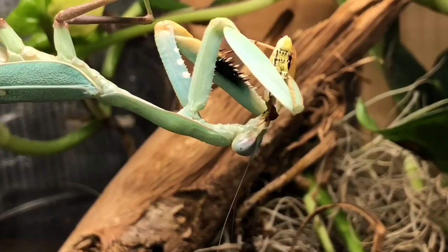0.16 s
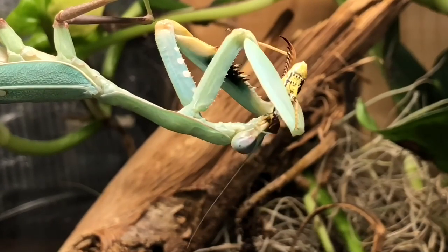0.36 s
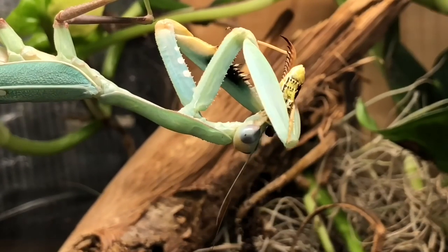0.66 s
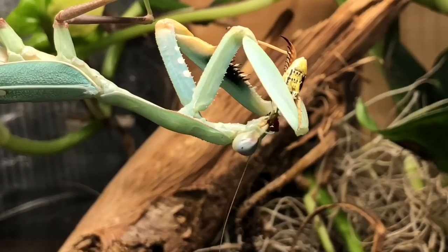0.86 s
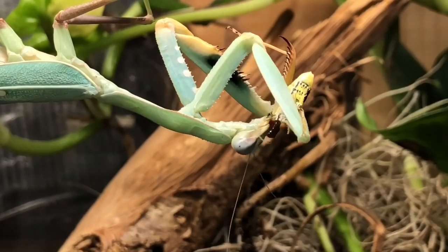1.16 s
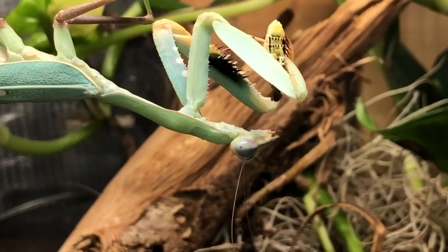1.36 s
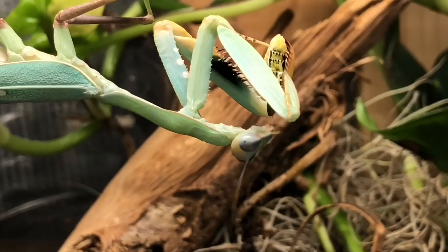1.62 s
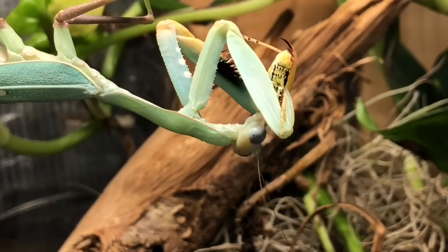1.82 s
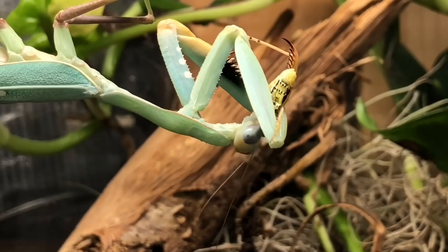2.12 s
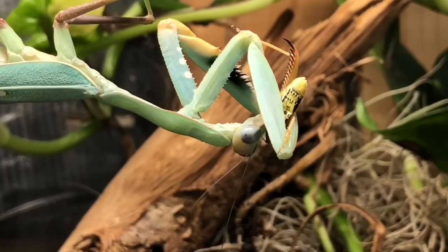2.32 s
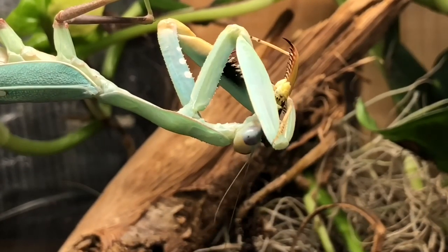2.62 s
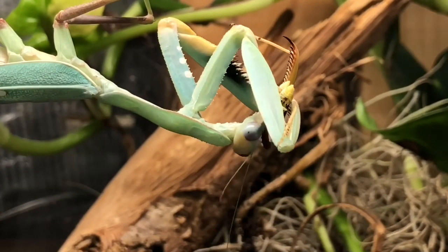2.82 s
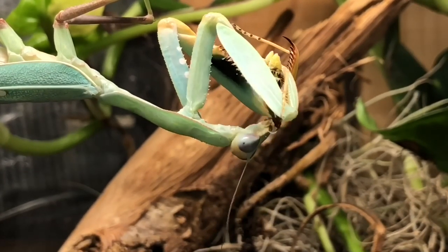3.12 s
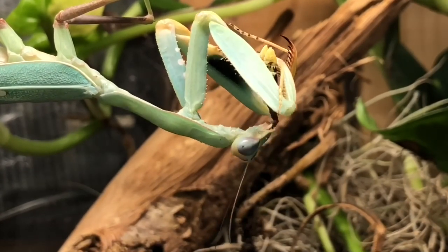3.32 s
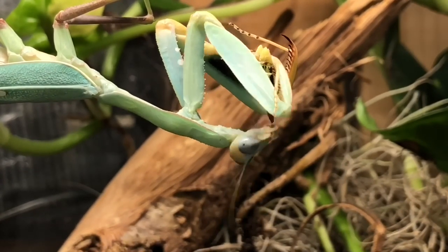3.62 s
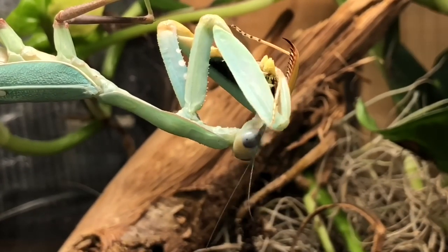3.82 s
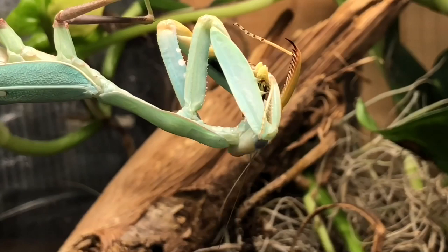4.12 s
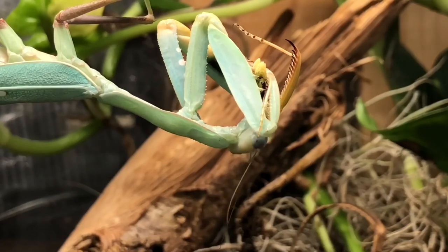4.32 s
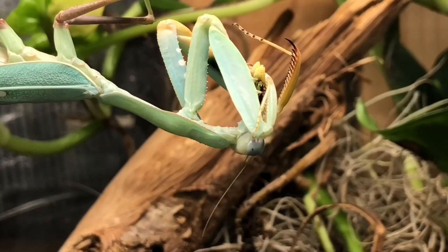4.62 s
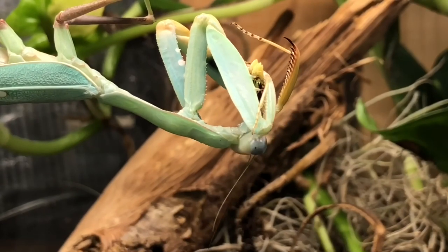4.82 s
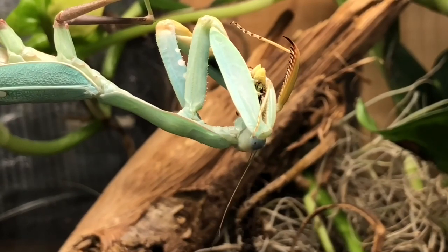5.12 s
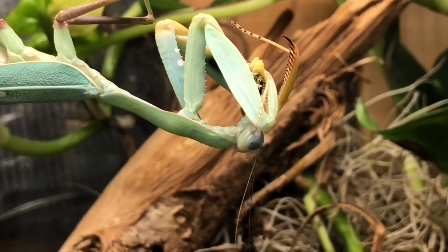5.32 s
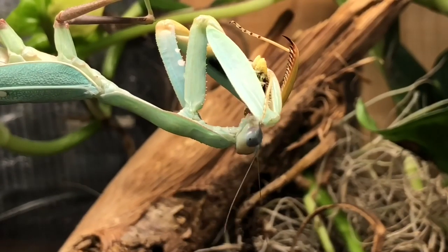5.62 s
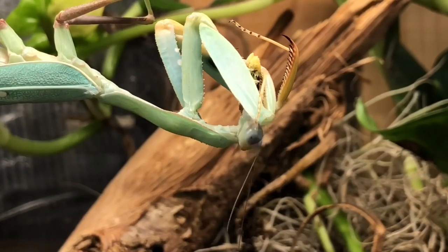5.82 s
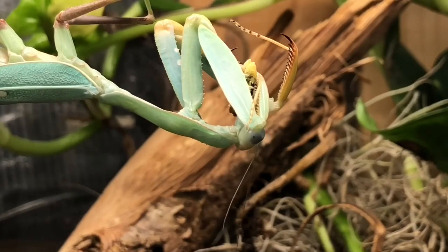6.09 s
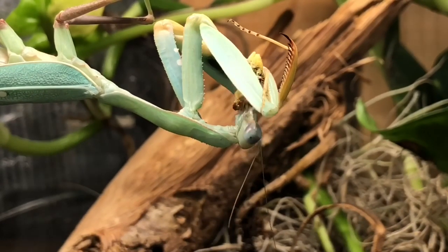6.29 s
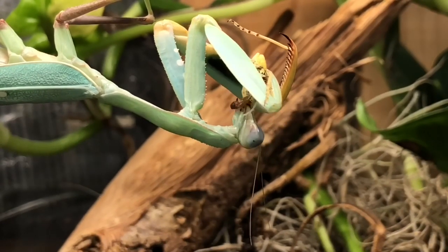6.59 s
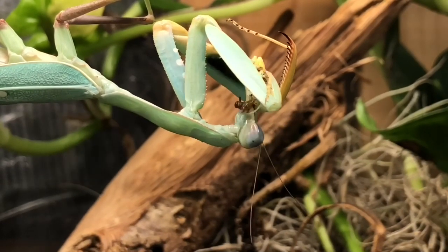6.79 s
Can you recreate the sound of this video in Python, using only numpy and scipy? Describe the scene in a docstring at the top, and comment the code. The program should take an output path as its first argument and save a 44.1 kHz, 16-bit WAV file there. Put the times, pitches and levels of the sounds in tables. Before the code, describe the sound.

Dry little snaps, scrapes and tears of insect shell being bitten, crowding together midway, then thinning out over steady airy hiss.

```python
"""Very close to a mantis chewing an insect, through a microphone with a steep bass cut; about seven seconds.
From the start a thin hiss and the whine of a small fan lie behind; the first bites are few, then come soft bumps.
Bites crowd together near 3 s, with scraping and tearing; the loudest falls at 3.6 s, then they thin out.
In each bite one jaw, then the other, breaks the shell: noise fractures excite resonances and a ring near 3 kHz.
Fan and hiss are filtered noise and sines, bumps dull noise pulses, scrapes gated crackle, tears runs of fractures."""
import sys
import numpy as np
from scipy import signal
from scipy.fft import rfft, irfft
from scipy.io import wavfile

SR = 44100
rng = np.random.default_rng(int(sys.argv[2]) if len(sys.argv) > 2 else 0)


def to_wav(s):
    """Save 16-bit WAV."""
    ch = np.atleast_2d(s).T  # columns
    pcm = np.round(np.clip(ch, -1, 1) * 32767)  # PCM
    wavfile.write(sys.argv[1], SR, pcm.astype(np.int16))


N = 306495  # samples

# Steady hiss behind the animal. Each row: frequency in Hz, relative level in dB.
HISS_COLOUR = [(30, -43), (100, -27), (400, -27.5), (480, -16.5), (700, -11), (1000, 3), (1500, 2),
               (2400, 8.5), (3000, 4), (4000, 0.5), (6500, -3), (8500, -5), (11000, -7.5), (16000, -9)]
# Air resonances of the fan. Each row: centre in Hz, width in Hz, relative level in dB.
FAN_RESONANCES = [(558, 42, -19), (1068, 26, -1.5), (1337, 150, -1), (1600, 67, 0.5), (1690, 31, -2),
                  (1940, 130, -7)]
# Whine of the fan. Each row: frequency in Hz, mean amplitude in dB.
FAN_WHINE = [(906, -67), (1600.5, -67), (1789, -71), (3200, -77), (3579.5, -64), (6401, -76.5),
             (14400, -92)]
# Slow drift of the background. Each row: time in seconds, rush near 1.7 kHz in dB before the wall echo,
# rush near 2.2 kHz in dB, high hiss in dB.
BACKGROUND_DRIFT = [(0, -88.5, -62.5, -88), (1.0, -79, -64.5, -87), (1.25, -76.5, -68, -74),
                    (1.8, -76.5, -65, -87), (2.5, -75, -64.5, -87), (2.7, -71.5, -68, -67.5),
                    (4.1, -67.5, -69, -77.5), (5.3, -74.5, -67, -81.5), (5.5, -63.5, -77.5, -69.5),
                    (6.95, -65.5, -77, -69.5)]
# Soft bumps. Each row: time in seconds, level in dB before a common 12 dB cut.
SOFT_BUMPS = [(1.234, -51), (1.315, -59), (1.813, -42.5), (1.855, -42), (2.143, -52), (2.48, -50.5),
              (2.519, -54), (4.375, -49.5), (5.245, -53.5), (5.286, -47.5), (5.486, -45.5), (5.531, -51),
              (6.178, -55.5), (6.229, -58)]
# Colour of a bump. Each row: frequency in Hz, relative level in dB.
BUMP_SPECTRUM = [(300, -29), (500, -9.5), (800, -6.5), (1000, 8.5), (1300, -7.5), (2500, -27)]
# Mouthparts scraping. Each row: start in seconds, end in seconds, shell ring in dB, crackle in dB.
SCRAPE_PASSAGES = [(1.45, 1.54, -70, -64), (1.968, 2, -51, -50.5), (2.759, 2.784, -45.5, -54),
                   (2.822, 3.074, -57, -66), (3.119, 3.157, -42, -48), (3.166, 3.207, -49.5, -56),
                   (3.27, 3.522, -55, -62.5), (3.542, 3.703, -63, -65.5), (4.28, 4.331, -52.5, -63.5),
                   (4.601, 4.813, -56.5, -67.5), (5.587, 5.702, -58, -66), (6.332, 6.438, -62.5, -62.5)]
# Tearing, a quick run of small fractures while the mantis pulls a piece off.
# Each row: start in seconds, end in seconds, mean shell ring in dB.
TEAR_RUNS = [(2.871, 2.968, -49), (3.412, 3.48, -49.5), (4.64, 4.762, -62)]
# Bright resonances that every fracture excites. Each row: centre in Hz, width in Hz, relative level in dB.
BRIGHT_RESONANCES = [(4470, 330, 0), (5555, 230, 1.5), (6550, 930, -2.5), (7620, 240, 3.5),
                     (8750, 980, -1.5), (9860, 280, 5), (10190, 1200, -3.5), (14230, 870, -4.5),
                     (13150, 430, -9.5), (14700, 800, -3)]
# Low, hollow resonances of the prey, shifted a little at each fracture.
# Each row: mean centre in Hz, width in Hz, mean relative level in dB.
HOLLOW_RESONANCES = [(1005, 220, -4.5), (1240, 710, -5), (1753, 290, -1), (2128, 72, 2.5), (2700, 300, -13)]
# Bites. Each row: time in seconds, shell ring in dB, ring pitch in Hz, sharp crack in dB,
# first jaw's fracture time scale in ms, second jaw against the first in dB.
JAW_BITES = [(0.166, -51.5, 3000, -44.5, 1.34, -20), (0.316, -56, 3130, -74, 0.46, -15),
             (0.8049, -56, 2850, -75, 1.5, -15), (0.8618, -44, 3060, -56, 1.4, -22),
             (0.9007, -45.5, 2020, -46, 1.26, -18), (0.9175, -43, 2060, -40, 2.1, -17),
             (1.607, -56, 2600, -52.5, 1.2, -9), (1.692, -60.5, 2930, -68, 2, -10),
             (1.9506, -56, 3100, -55.5, 0.99, -17), (1.9755, -42, 3010, -32, 0.21, -3.5),
             (2.3371, -51.5, 2860, -62, 3.6, -22), (2.3564, -53.5, 2850, -56, 4.4, -4),
             (2.5693, -41.5, 3530, -46.5, 0.85, -6), (2.763, -56.5, 2930, -52.5, 2.7, 9.5),
             (2.83, -41.5, 2850, -50.5, 1.3, 1.5), (2.886, -46, 2900, -50.5, 1.8, -21),
             (2.899, -43, 2900, -48, 0.9, -4), (2.9239, -44, 3690, -44.5, 2.9, 2),
             (2.935, -37.5, 2930, -50, 0.88, -13), (2.9786, -40, 3370, -47, 0.73, -6),
             (2.9906, -33, 3030, -36, 0.68, -27), (3.0306, -39, 3140, -61, 1.2, -28),
             (3.0426, -39.5, 4010, -48, 2.2, -16), (3.058, -38, 3040, -50, 0.84, -21),
             (3.1386, -41, 3950, -36, 0.91, -5), (3.1853, -30.5, 3300, -41.5, 0.64, -15),
             (3.2331, -50, 2940, -59.5, 1.3, 6), (3.2569, -28, 3230, -31.5, 0.92, -7),
             (3.3525, -46.5, 3300, -54.5, 1.4, -12), (3.3782, -46, 3000, -60, 1.9, -20),
             (3.4047, -44, 3800, -52.5, 2.5, -18), (3.4871, -41, 3320, -49, 1.1, -10),
             (3.5333, -35, 3200, -43, 2.2, -19), (3.5479, -30, 3540, -42, 1.66, -18),
             (3.6078, -18.5, 3380, -26, 1.2, -23), (4.254, -50.5, 3350, -60.5, 0.51, -20),
             (4.2883, -39, 2860, -51, 2.2, -21), (4.5702, -54.5, 3400, -73, 0.74, -15),
             (4.591, -44.5, 3010, -53, 2.2, -18), (4.7744, -35, 2420, -52.5, 1.4, -17),
             (4.8442, -51, 2920, -87, 1.6, -7), (4.8592, -49.5, 2830, -88, 1.6, -1.5),
             (5.3669, -42, 2600, -61, 0.36, -11), (5.374, -46, 2870, -52, 2.3, -3),
             (5.391, -42.5, 2480, -75, 0.73, -12), (5.4412, -50, 2290, -77, .5, -15),
             (5.458, -52.5, 2380, -75, 3.9, -15), (5.6336, -34.5, 2940, -35.5, 3, 5),
             (5.644, -25, 2980, -34, 0.88, -19), (5.652, -32.5, 2500, -36, 1.9, -15),
             (5.7537, -41, 3204, -48, 5.7, -3), (5.824, -52, 3330, -64, 2.4, -17),
             (5.8341, -53.5, 3290, -55, 4.7, -17), (5.899, -49, 3370, -50.5, 2, -2),
             (6.2981, -39.5, 2470, -61, 0.99, -20), (6.6072, -55, 2840, -67, 1.1, -8)]

# samples that hold one short sound, and the silent samples that open a fracture
WINDOW, LEAD = 2048, 256
TEARS_PER_S, TEAR_RING_HZ, TEAR_CRACK_DB, TEAR_MS = 55, 3270, -6.5, 1.13
# the second jaw closes just after the first, on shell that is already cracked, and sounds duller
SECOND_JAW_S, SECOND_CRACK_DB, SECOND_JAW_MS = 0.0058, -4, 1.62
# the hollow body answers every fracture: its typical level, and how it follows ring, crack and length
TYPICAL_RING_DB, TYPICAL_CRACK_DB, TYPICAL_BODY_DB = -40.5, -53, -50
BODY_PER_RING, BODY_PER_CRACK, BODY_DB_PER_DOUBLING = 0.45, 0.26, 2
# harder cracks are brighter: dB of top treble per dB of crack
TREBLE_PER_CRACK = 0.26
RECORDER_TOP_HZ = 16400


def undb(db):
    """Decibels to gain."""
    return 10 ** (np.asarray(db) / 20)


def unit(x):
    """Scale to rms 1."""
    return x / np.sqrt(np.mean(x ** 2))


def colour(x, points):
    """Shape a sound with a smooth (Hz, dB) spectrum."""
    hz, db = np.transpose(points)
    f = np.fft.rfftfreq(len(x), 1 / SR)
    gain = undb(np.interp(np.log(f + 1), np.log(hz), db))
    return irfft(rfft(x) * gain, len(x))


def resonate(x, hz, width_hz):
    """One damped resonance, gain 1 at its centre."""
    b, a = signal.iirpeak(hz, hz / width_hz, fs=SR)
    return signal.lfilter(b, a, x)


def ring(x, modes):
    """A set of resonances; neighbours swing in opposite directions."""
    return sum((-1) ** k * undb(db) * resonate(x, hz, width)
               for k, (hz, width, db) in enumerate(modes))


def cut_below(x, hz, order):
    """High-pass."""
    return signal.sosfilt(signal.butter(order, hz, "high", fs=SR, output="sos"), x)


def shell_band(x, centre_hz, half_width_hz):
    """The broad, steep-sided band in which the shell rings."""
    edges = [centre_hz - half_width_hz, centre_hz + half_width_hz]
    return signal.sosfilt(signal.butter(3, edges, "band", fs=SR, output="sos"), x)


def walk(rate):
    """Random wavering with a spread near 1, through this many random points a second."""
    knots = rng.standard_normal(4096)
    return np.interp(np.arange(N) / SR * rate, np.arange(len(knots)), knots)


def grains(size, spread_db):
    """Dense tiny fractures: mostly weak, a few strong."""
    kick, strength = rng.standard_normal((2, size))
    return unit(kick * undb(spread_db * strength))


def add(out, s, sound):
    """Mix a sound in at time s."""
    i = max(int(s * SR), 0)
    out[i:i + len(sound)] += sound[:len(out) - i]


def burst(x, db):
    """Give a short sound the energy of 10 ms at this level."""
    return x * undb(db) * np.sqrt(SR / 100 / np.sum(x ** 2))


def fan_whine():
    """Steady tones of the fan, each wavering slightly in level and pitch."""
    whine = np.zeros(N)
    for hz, db in FAN_WHINE:
        level = undb(db + walk(5.0))
        pitch_hz = hz * (1 + .0004 * walk(9.2))
        whine += level * np.sin(2 * np.pi * np.cumsum(pitch_hz) / SR)
    return whine


def background(wall_s=0.004962, wall_share=0.27):
    """Smooth noise hiss, with a fan's resonant rush and its whine."""
    t = np.arange(N) / SR
    s, *columns = np.transpose(BACKGROUND_DRIFT)
    low_db, mid_db, high_db = (np.interp(t, s, c) for c in columns)
    noise = rng.standard_normal((5, N))
    hiss = undb(-65.5) * unit(colour(noise[0], HISS_COLOUR))
    hiss += undb(high_db) * unit(colour(noise[1], [(2000, -40.5), (6000, -9.5), (13000, -3.5)]))
    rush = undb(-65.5) * unit(ring(noise[2], FAN_RESONANCES))
    rush += undb(low_db) * unit(resonate(resonate(noise[3], 1700, 350), 1700, 350))
    # an echo from a nearby wall ripples the spectrum and makes this part of the rush hollow
    rush += wall_share * np.interp(t - wall_s, t, rush)
    rush += undb(mid_db) * unit(resonate(resonate(noise[4], 2070, 290), 2270, 330))
    air = colour(hiss + cut_below(rush, 520, order=8), [(15700, 0), (16100, -35)])
    return air + fan_whine()


def bumps(decay_s=0.0031):
    """Soft, dull knocks: noise that swells and dies within milliseconds."""
    t = np.arange(WINDOW) / SR
    out = np.zeros(N)
    for s, db in SOFT_BUMPS:
        pulse = rng.standard_normal(WINDOW) * t * np.exp(-t / decay_s)
        knock = colour(pulse, BUMP_SPECTRUM)
        add(out, s - .002, burst(knock, db - 12))
    return cut_below(out, 493, order=8)


def scraping(edge_s=0.02, patchy_db=5.5, slip_db=6):
    """Mouthparts catch and slip on the shell: a fine, uneven crackle."""
    t = np.arange(N) / SR
    # each slip lasts a few milliseconds, and the grip between slips is much quieter
    slipping = undb(7 * np.tanh(walk(330) - .5) + patchy_db * np.tanh(walk(45)))
    slips = grains(N, slip_db) * slipping
    shell = unit(shell_band(slips, centre_hz=3264, half_width_hz=960))
    bright = ring(slips, BRIGHT_RESONANCES) + 0.12 * slips
    crackle = unit(colour(bright, [(2500, -17), (5000, -4.0), (9000, -10.5), (16000, -10)]))
    out = np.zeros(N)
    for start, end, ring_db, crackle_db in SCRAPE_PASSAGES:
        contact = np.clip(np.minimum(t - start, end - t) / edge_s + .5, 0, 1)
        on = contact > 0
        scrape = undb(ring_db) * unit(shell[on]) + undb(crackle_db) * unit(crackle[on])
        out[on] += contact[on] * scrape
    return cut_below(out, 480, order=4)


def shell_ring(ms, length_ms, ring_hz, swell, tail):
    """The shell swings up for a few cycles at its own pitch, roughened by the splintering."""
    build_up = ms / max(length_ms, .9)
    envelope = np.hypot((build_up * np.exp(1 - build_up)) ** 4, tail / 2)
    swing = envelope * np.sin(2 * np.pi * ring_hz * ms / 1000)
    rough = rng.standard_normal(WINDOW) * np.hypot(swell / 2, tail)
    splinters = shell_band(rough, ring_hz, half_width_hz=890)
    return colour(unit(swing) + .65 * unit(splinters), [(2000, -12), (2600, 0), (4000, 0), (4500, -18)])


def hollow_body(force):
    """The prey's hollow resonances, pushed by the fracture and by one sharp knock."""
    # each fracture lands on another spot, so the resonances shift and trade strength
    spot = rng.standard_normal((len(HOLLOW_RESONANCES), 2))
    modes = [(hz * np.exp(.04 * shift), width, db + 4 * strength)
             for (hz, width, db), (shift, strength) in zip(HOLLOW_RESONANCES, spot)]
    push = force / np.linalg.norm(force) + signal.unit_impulse(WINDOW, LEAD)
    return cut_below(ring(push, modes), 720, order=2)


def sharp_crack(force, crack_db, length_ms, bright_db):
    """Bright resonances of the break; a quick, hard fracture is brighter than a slow crush."""
    tilt_db = .5 + bright_db * np.log2(length_ms) + TREBLE_PER_CRACK * (crack_db - TYPICAL_CRACK_DB)
    bright = ring(force, BRIGHT_RESONANCES) + 0.2 * force
    return colour(bright, [(3500, -9.5), (5000, 5.5), (9000, 2.5), (15000, tilt_db)])


def fracture(ring_db, ring_hz, crack_db, length_ms, echo_ms=3, bright_db=-4):
    """The shell gives way in a swell of tiny fractures; near surfaces scatter a short tail."""
    # a harder or slower break shakes the hollow body more
    body_db = (TYPICAL_BODY_DB + BODY_PER_RING * (ring_db - TYPICAL_RING_DB)
               + BODY_PER_CRACK * (crack_db - TYPICAL_CRACK_DB) + BODY_DB_PER_DOUBLING * np.log2(length_ms))
    ms = 1000 * np.maximum(np.arange(WINDOW) - LEAD, 0) / SR
    progress = ms / length_ms
    swell = 2 * progress * np.exp(1 - 2 * progress)
    tail = .3 * np.exp(-ms / echo_ms) * np.minimum(progress, 1)
    force = grains(WINDOW, spread_db=-5.5) * np.hypot(swell, tail)
    sound = burst(shell_ring(ms, length_ms, ring_hz, swell, tail), ring_db)
    sound += burst(hollow_body(force), body_db)
    sound += burst(sharp_crack(force, crack_db, length_ms, bright_db), crack_db)
    # a very faint, dull low-frequency noise under each fracture
    low_noise = burst(colour(force, [(450, 5), (3000, -32)]), body_db - 47.5)
    return cut_below(sound, 620, order=4) + low_noise


def tearing(uneven=0.23, scatter_db=0.5, pitch_scatter=.07):
    """Small fractures follow each other at uneven gaps, each with its own strength and pitch."""
    out = np.zeros(N)
    gap_s = 1 / TEARS_PER_S
    for start, end, db in TEAR_RUNS:
        times = np.arange(start + .5 / TEARS_PER_S, end, gap_s)
        for s, (late, strong, high) in zip(times, rng.standard_normal((len(times), 3))):
            ring_db = db + scatter_db * strong
            ring_hz = TEAR_RING_HZ * np.exp(pitch_scatter * high)
            snap = fracture(ring_db, ring_hz, ring_db + TEAR_CRACK_DB, TEAR_MS)
            add(out, s + uneven * late * gap_s - LEAD / SR, snap)
    return out


def chewing():
    """All the bites: one jaw breaks the shell, then the other."""
    out = np.zeros(N)
    for s, ring_db, ring_hz, crack_db, length_ms, second_db in JAW_BITES:
        start = s - LEAD / SR
        add(out, start, fracture(ring_db, ring_hz, crack_db, length_ms))
        second_crack_db = crack_db + second_db + SECOND_CRACK_DB
        second_jaw = fracture(ring_db + second_db, ring_hz, second_crack_db, SECOND_JAW_MS)
        add(out, start + SECOND_JAW_S, second_jaw)
    return out


def scene():
    """The chewing close by, over the background; one channel."""
    return (background() + bumps() + scraping() + chewing() + tearing())[None]


def record(dry):
    """The recorder cuts the top with a steep low-pass."""
    return signal.sosfilt(signal.ellip(8, .2, 70, RECORDER_TOP_HZ, fs=SR, output="sos"), dry)


dry = scene()
out = record(dry)
to_wav(out)
```